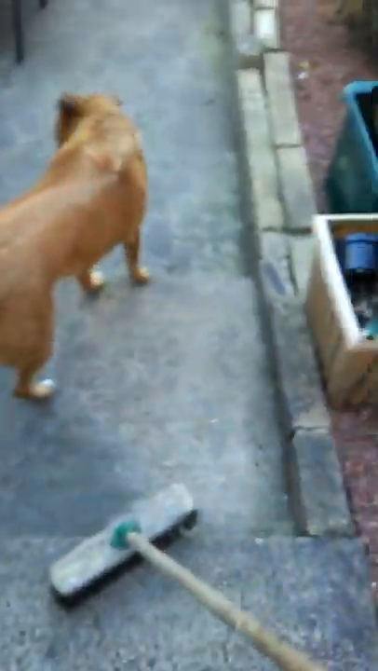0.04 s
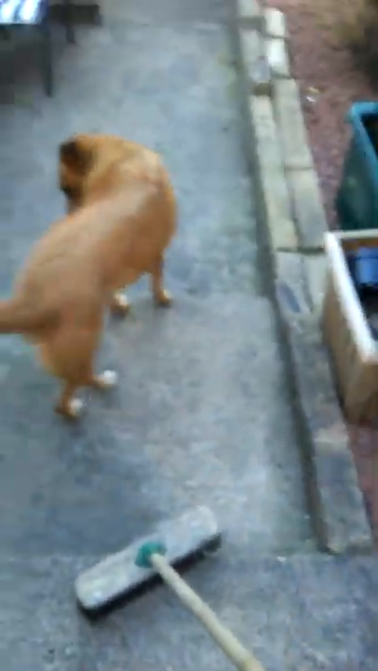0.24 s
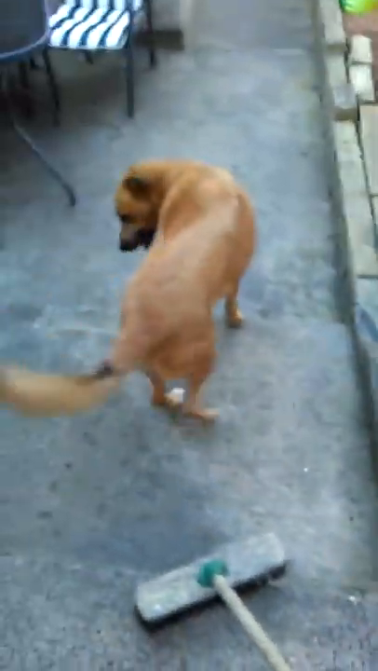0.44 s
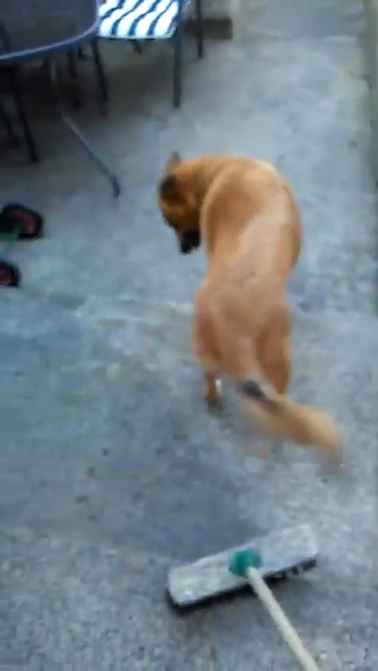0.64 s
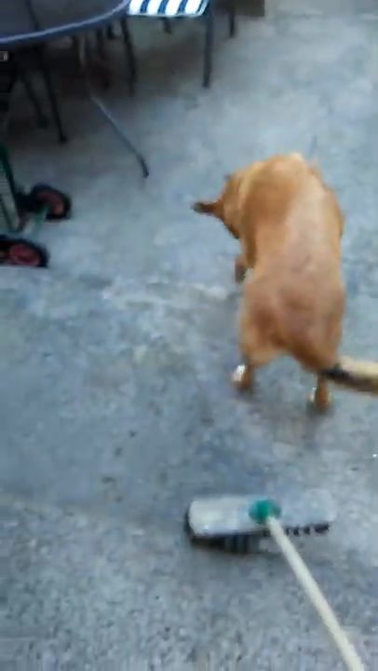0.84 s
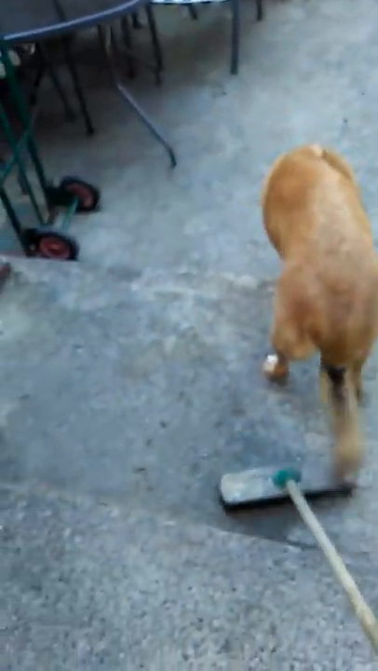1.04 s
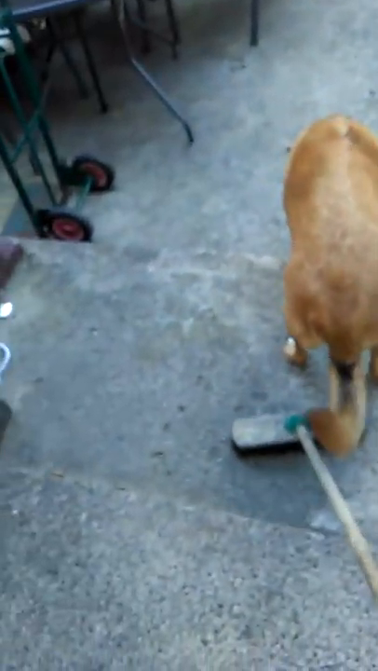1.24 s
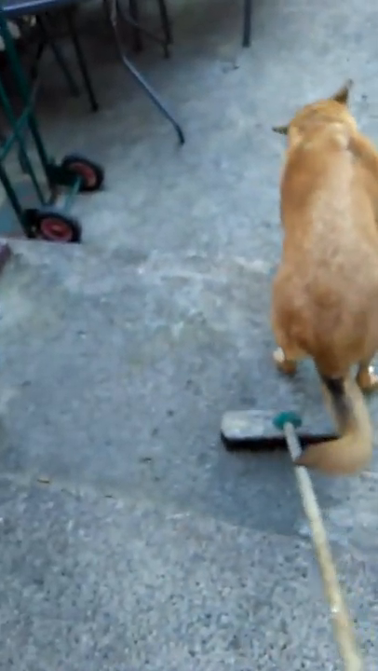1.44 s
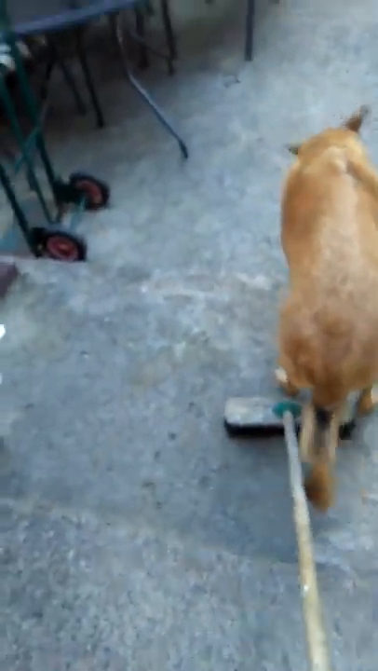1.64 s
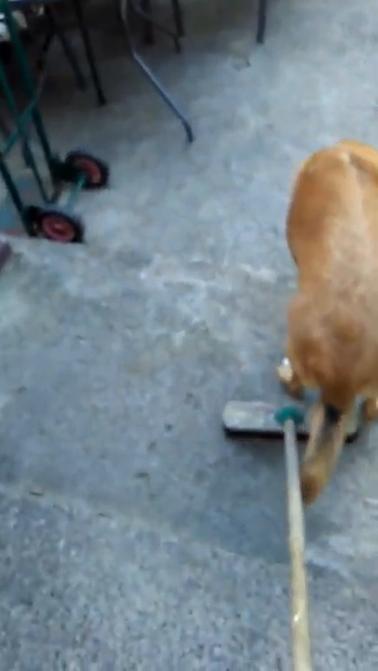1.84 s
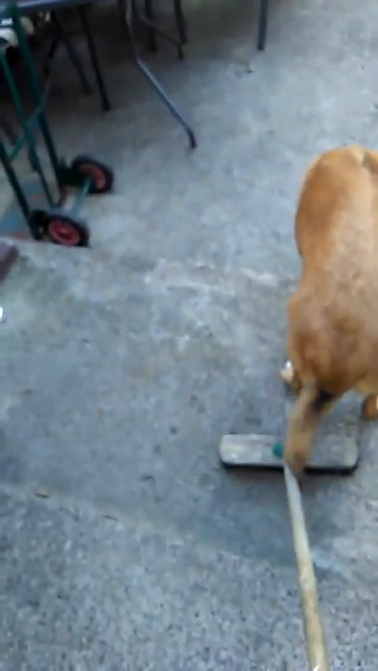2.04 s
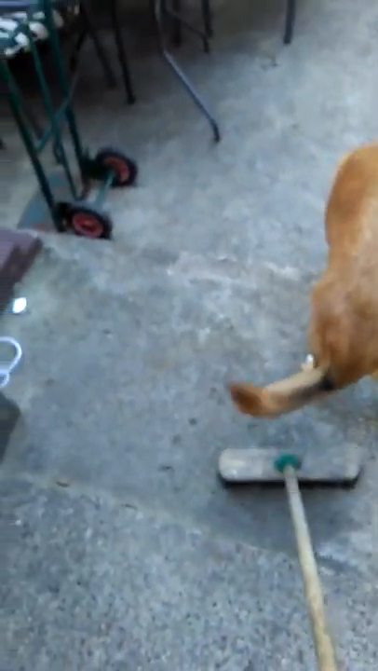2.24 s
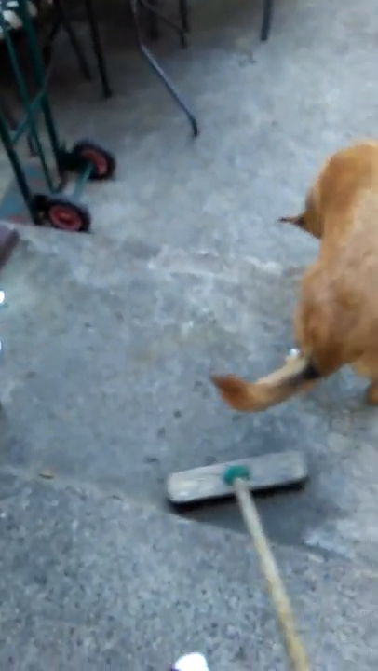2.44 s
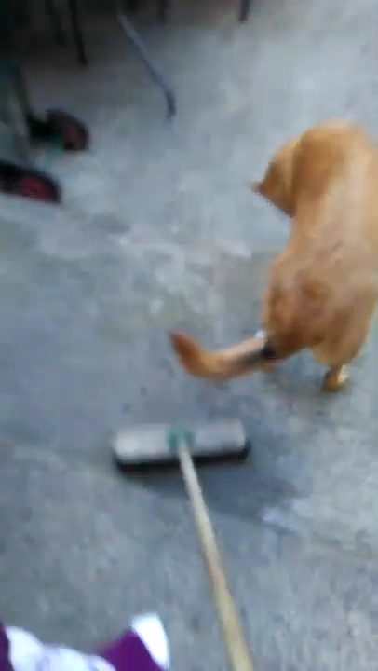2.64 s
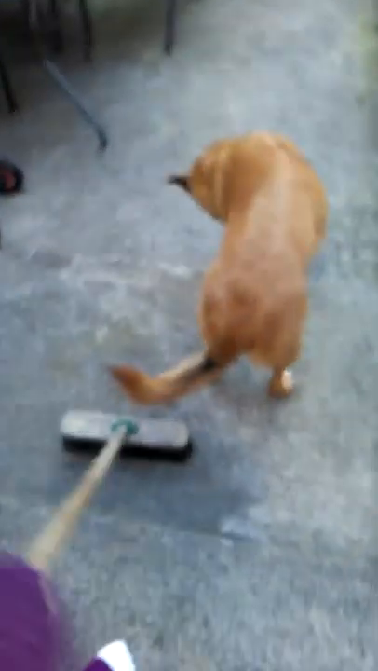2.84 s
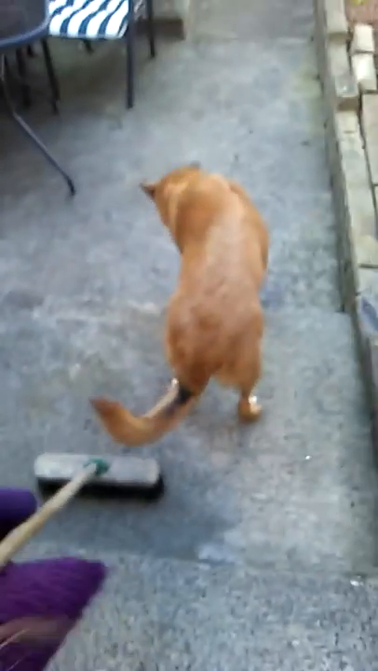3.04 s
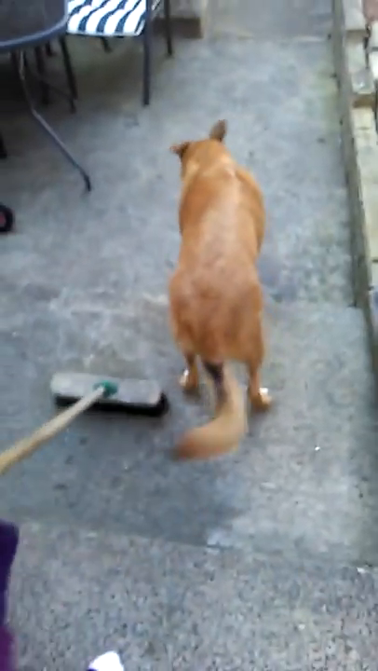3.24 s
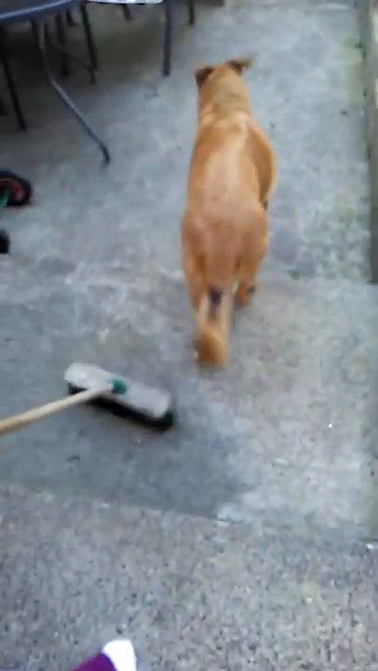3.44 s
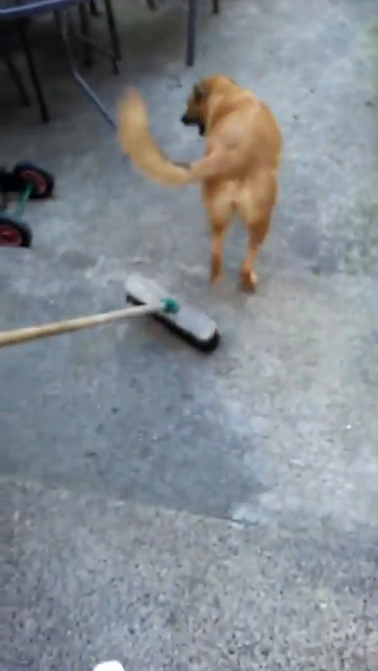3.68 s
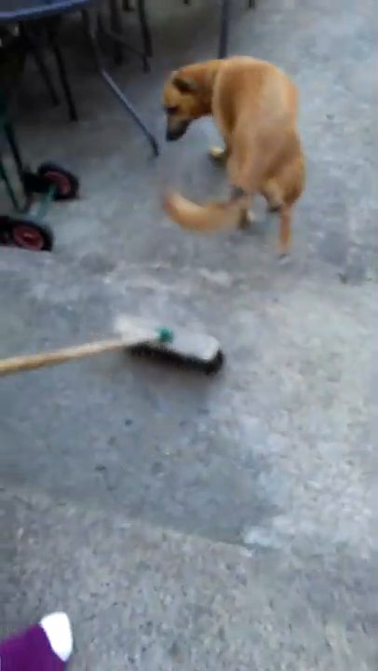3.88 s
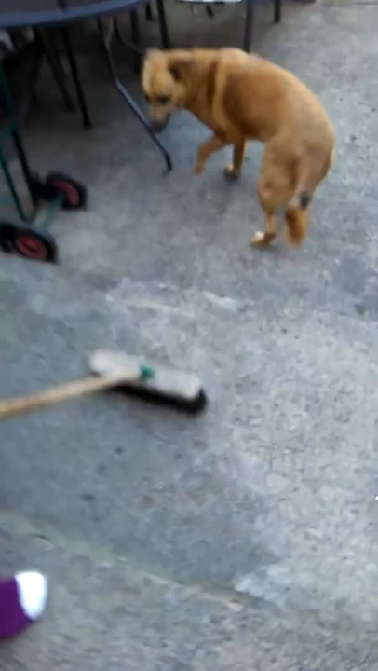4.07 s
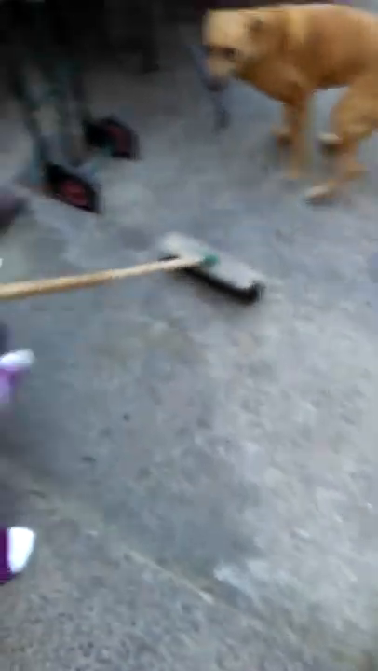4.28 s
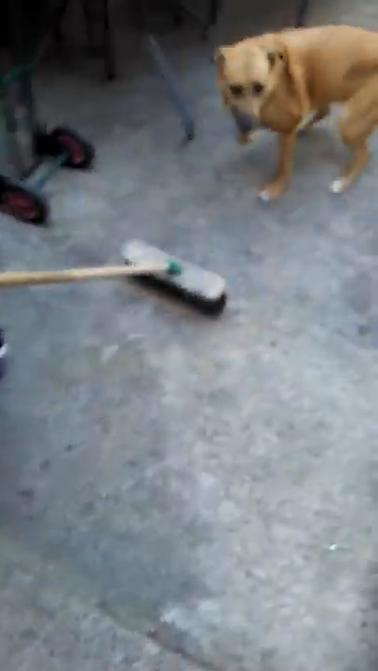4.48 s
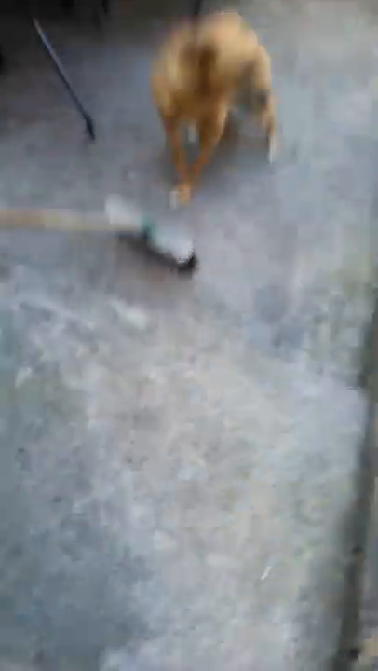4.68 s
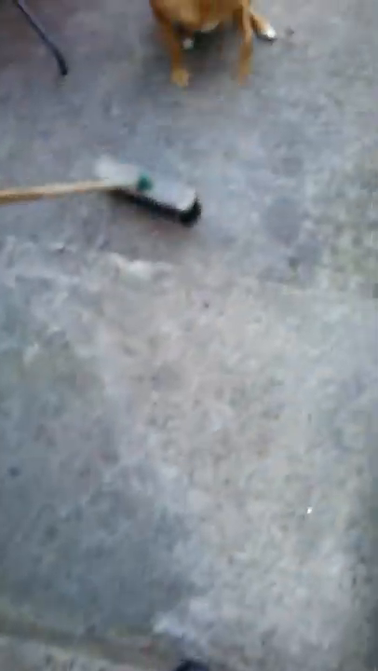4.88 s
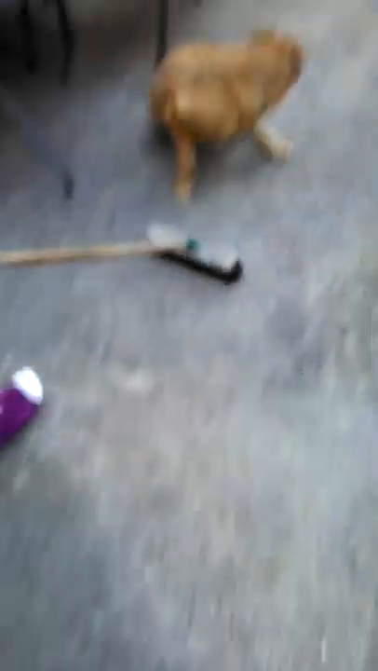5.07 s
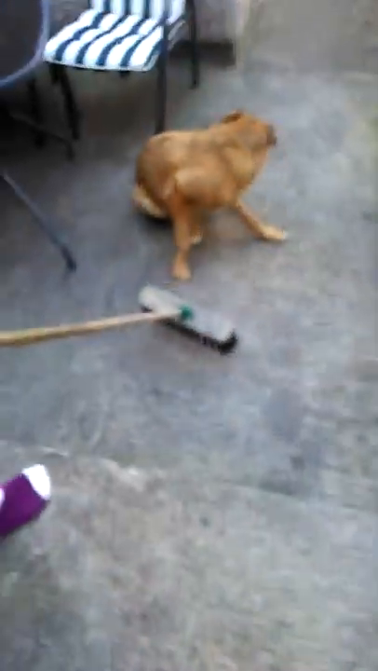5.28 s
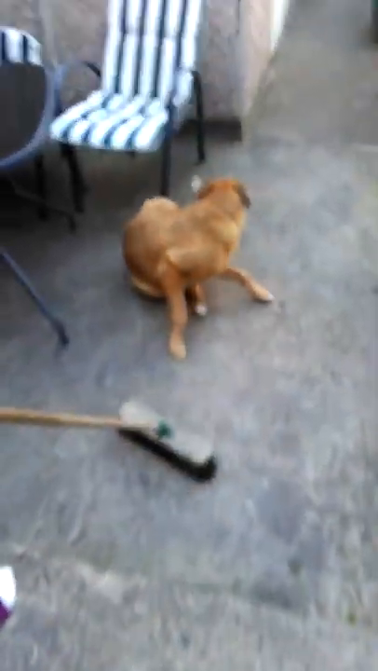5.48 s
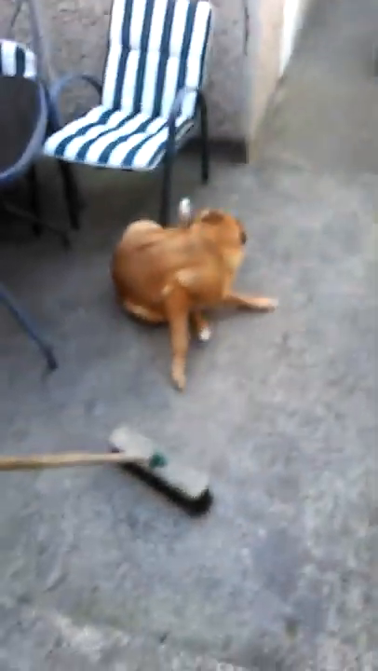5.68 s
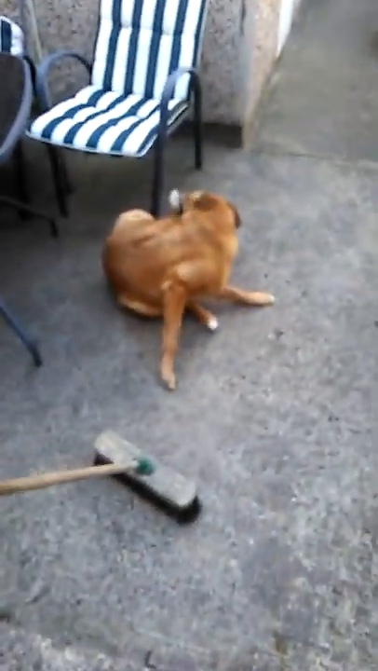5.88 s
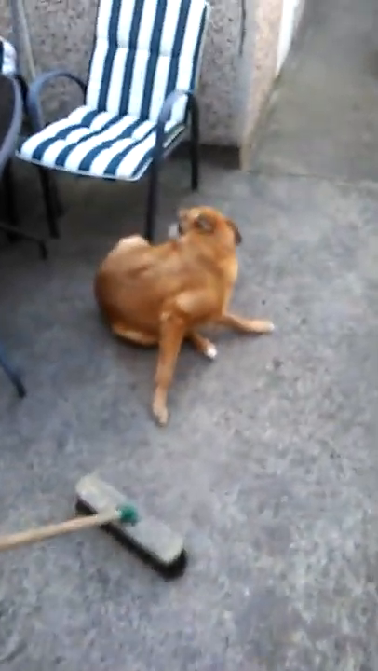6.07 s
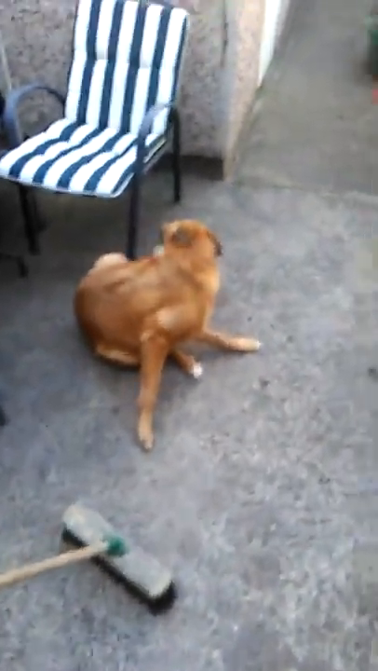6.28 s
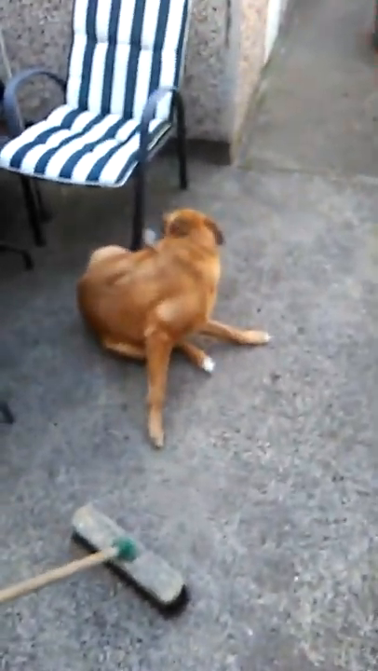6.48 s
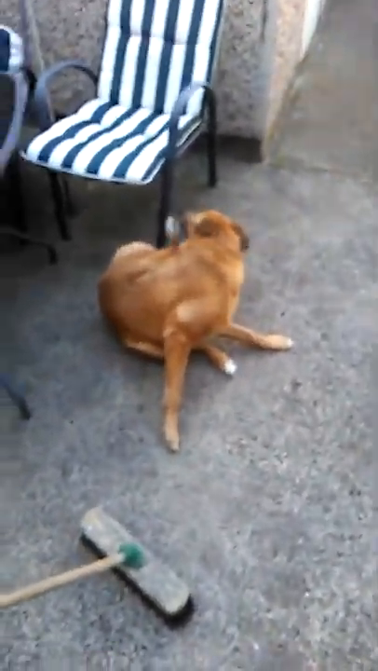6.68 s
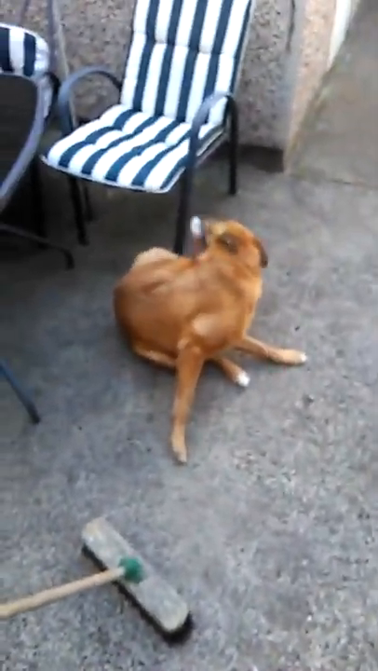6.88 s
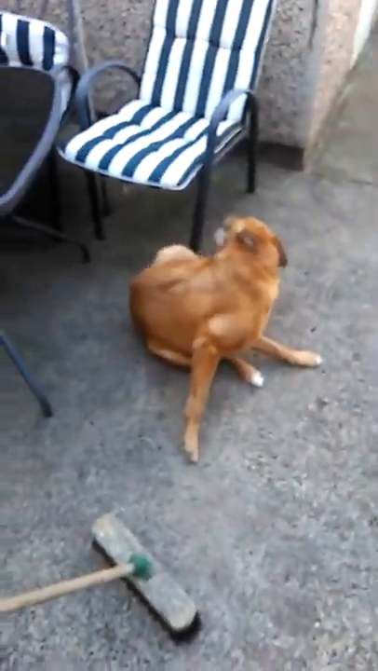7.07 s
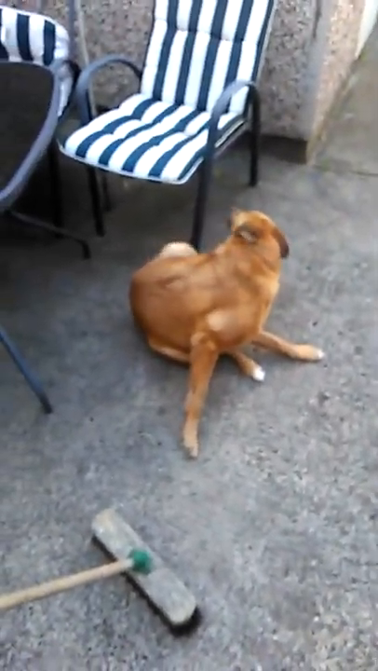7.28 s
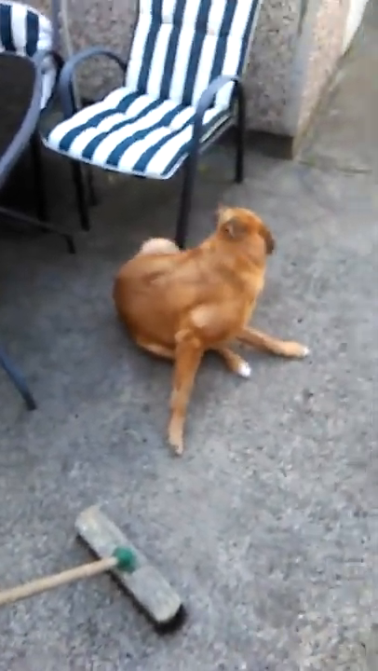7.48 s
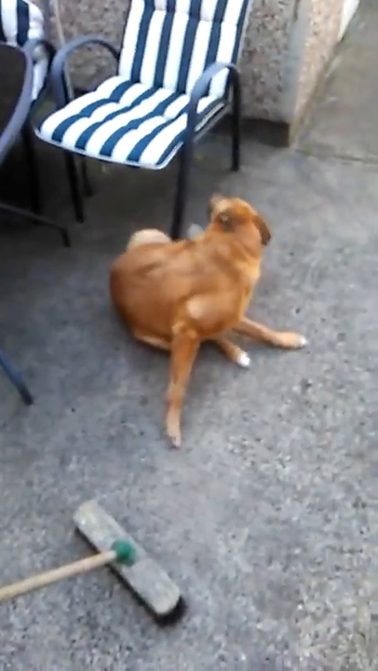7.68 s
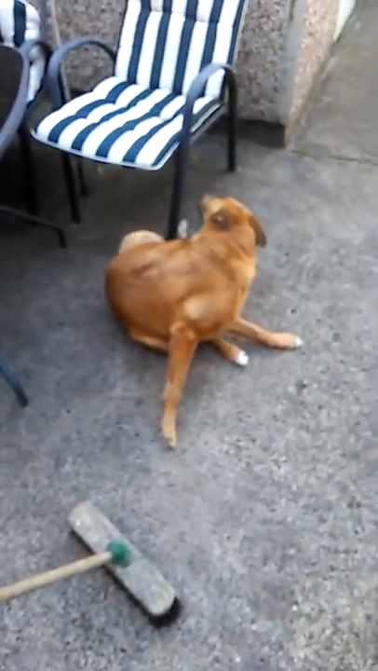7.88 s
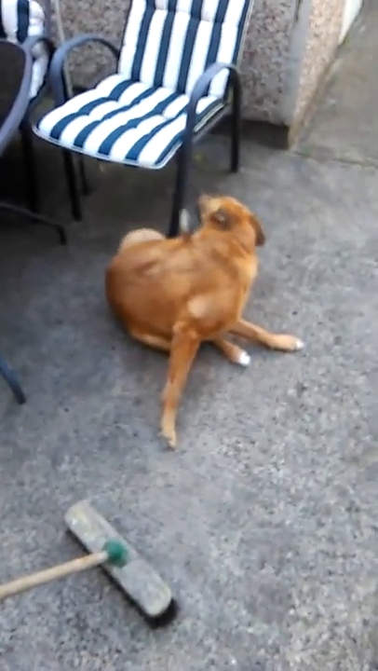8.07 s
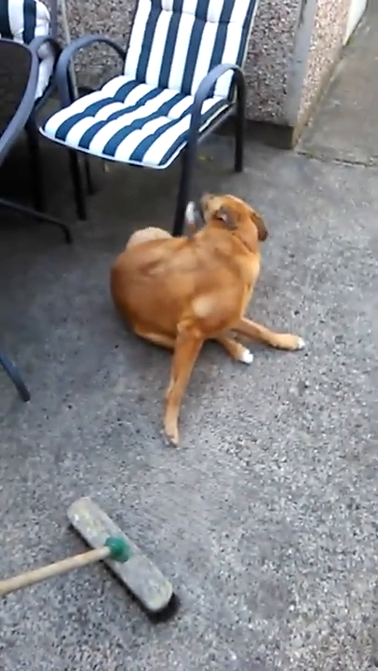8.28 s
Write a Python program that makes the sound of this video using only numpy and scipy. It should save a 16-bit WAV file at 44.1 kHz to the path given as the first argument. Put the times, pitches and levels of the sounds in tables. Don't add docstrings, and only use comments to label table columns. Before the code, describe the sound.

Coarse bristles rasp over a patio, the broom head clacking down harder each time, before quiet, faint dog grunts and dry claw scratching.

```python
import sys
import numpy as np
from scipy import signal
from scipy.fft import rfft, irfft, next_fast_len
from scipy.io import wavfile
from scipy.ndimage import uniform_filter1d, map_coordinates

SR = 44100
rng = np.random.default_rng(int(sys.argv[2]) if len(sys.argv) > 2 else 0)


def digitize_waveform(pressure):
    field = np.atleast_2d(pressure).T
    bounded = np.clip(field, -1, 1)
    quanta = np.round(bounded * 32767).astype(np.int16)
    wavfile.write(sys.argv[1], SR, quanta)


def undo_db(level):
    steps = np.asarray(level, float) / 20
    return 10 ** steps


N = 366912
STEP = 16

# [touch-down t/s, shove already under way/s, whole shove/s, peak level/dB, tip hiss level/dB]
SHOVES = [(0, 0.22, 0.36, -49, -49), (.215, 0.01, 0.13, -46.5, -44), (.44, 0.067, 0.46, -62, 0),
          (0.745, 0.051, 0.33, -35.5, -9), (1.093, 0.12, 0.33, -42.5, -8), (1.27, 0.12, 0.39, -47.5, -12),
          (1.491, 0.046, 0.18, -48.5, -9), (1.554, 0.11, 0.38, -36.5, -13.5), (1.91, 0.057, 0.31, -43, -9),
          (2.03, 0.0089, 0.23, -44.5, -11), (2.13, 0.037, 0.43, -46, -8), (2.412, 0.006, 0.12, -44.5, -12),
          (2.498, 0.041, 0.17, -39.5, -26), (2.63, 0.068, 0.34, -42.5, -5.5),
          (2.8, 0.079, 0.36, -57.5, -20), (3.127, 0.064, .29, -26.5, -11),
          (3.498, 0.018, 0.22, -26.5, -8.5), (4.03, 0.064, 0.21, -53.5, -6), (4.12, 0.015, 0.25, -23.5, -7),
          (4.573, 0.059, 0.16, -31.5, -6.5), (4.621, 0.0092, 0.4, -56.5, -13.5),
          (5.001, 0.078, 0.27, -28, -7.5), (5.464, 0.02, 0.088, -36.5, -12.5),
          (5.54, 0.08, 0.29, -58.5, -3.5)]
# [f/Hz, level/dB per Hz]
BRISTLE_TIPS = [(2800, -31.5), (3500, -19), (3900, -3.5), (4350, 4), (5000, 3), (6000, 3.5), (7200, -10.5),
                (9000, -36.5)]
# [f/Hz, level/dB per Hz]
BENT_BRISTLES = [(2600, -32), (3300, -7), (3800, -1), (4400, -2), (5200, -29.5)]
# [f/Hz, level/dB per Hz]
BRISTLE_SHAFTS = [(1300, -30), (1800, -6), (2150, -5.5), (2500, 0.5), (2900, -3), (3300, -0.5),
                  (3700, -1.5), (4400, -33)]
# [f/Hz, level/dB per Hz]
TIP_HISS = [(5500, -11), (7500, 5.5), (10000, 3.5), (14000, -7.5), (16000, -63)]
# [f/Hz, width/Hz, level/dB]
HEAD_MODES = [(510, 460, -7.5), (670, 160, 2), (932, 78, 1.5), (1470, 170, 0.5), (1848, 267, -6.5),
              (2484, 82, 4.5)]
# [t/s, level/dB]
HEAD_LOAD = [(0, -6), (.5, -11), (.9, -14), (1.3, -15.5), (1.75, -8.5), (2.0, -22), (2.45, -8), (2.75, -8),
             (3.05, -15.5), (3.2, -9.5), (3.5, -7), (5.0, -6.5), (5.9, -12.5)]
# [t/s, level/dB]
BENT_SHARE = [(0, -3), (.5, -8), (1, -14), (1.3, -20), (2.4, -23), (2.55, -1), (2.75, -13.5), (3.2, -4),
              (3.6, -3.5), (4.25, -15), (4.65, -10.5), (5.1, -2), (5.6, -7)]
# [t/s, level/dB]
SHAFT_SHARE = [(0, -4.5), (.28, -2), (.9, -9.5), (1.15, -9.5), (1.65, -9), (2.1, -8.5), (2.4, -11.5),
               (2.55, -3), (2.75, -9), (3.22, -11.5), (3.6, -10.5), (4.25, -9.5), (4.62, -6), (5.1, -7),
               (5.5, -0.5), (5.65, -3)]
# [t/s, left-right level/dB]
BROOM_PLACE = [(0.0, 6), (0.72, 0), (0.82, 3), (2.97, 1), (3.07, -7.5), (3.14, 4), (3.22, -2.5), (3.45, 8),
               (3.5, -0.5), (3.99, 3), (4.01, 0), (5.45, 5.5), (5.49, 1.5), (5.9, 6.5)]
# [t/s, thud level/dB, clack level/dB, splash level/dB, clack f/Hz]
DROPS = [(1.092, -59, -32, -25, 1500), (1.0962, -53, -28.5, -25, 1650), (1.1, -37.5, -40, -28, 1090),
         (1.1045, -50, -27, -24.5, 1610), (1.1076, -50, -25, -38, 1760), (1.554, -50, -51, -33, 1960),
         (1.658, -40.5, -35.5, -44, 910), (2.548, -45, -39, -56, 1470), (3.130, -28.5, -30, -32, 1160),
         (3.1374, -32.5, -21.5, -32.5, 1000), (3.1396, -15.5, -14.5, -20.5, 1080),
         (3.499, -33.5, -32.5, -27.5, 1400), (3.535, -34.5, -19, -17, 1550), (3.956, -91, -49.5, -58, 2100),
         (4.031, -56.5, -40, -34, 670), (4.061, -31, -28.5, -26.5, 980), (4.576, -33.5, -24.5, -41, 1555),
         (4.58, -42, -30.5, -39.5, 1950), (4.583, -37.5, -26.5, -40, 750), (5.004, -44, -30, -26, 1300),
         (5.007, -44.5, -29, -24.5, 2100), (5.02, -16, -23, -59, 740), (5.222, -50, -54, -47, 749),
         (5.397, -38, -52, -62, 1713), (5.475, -28, -29.5, -24, 1830), (5.486, -14, -24, -45, 1610),
         (5.499, -28, -34, -50, 1510), (5.525, -35.5, -61, -40, 748), (6.013, -56, -41, -67, 900)]
# [f/Hz, level/dB, t60/s]
FREE_MODES = [(120, -8, .09), (195, -3, .06), (290, 1, .06), (395, 0, .06), (485, -5, .04), (600, -10, .03)]
# [f/Hz, level/dB, t60/s]
GRIPPED_MODES = [(188, -14, 0.054), (230, -1, 0.035), (350, -1, 0.035), (424, 11, 0.015),
                 (480, -0.5, 0.015), (758, -17, 0.05)]
# [f/Hz, level/dB per Hz]
RATTLE = [(400, -28.5), (750, 3), (1100, -1.5), (1800, -5), (2400, -9), (3200, -29.5)]
# [t/s, length/s, level/dB, f/Hz,
# width/octaves]
DRAGS = [(7.15, 0.067, -68.5, 5700, .2), (7.15, 0.062, -70, 4230, .15), (7.16, .04, -72, 2600, 0.14),
         (4.19, .13, -43, 1600, .08), (5.09, .04, -46.5, 1800, .07), (3.135, 0.044, -38, 210, 0.28),
         (4.058, .05, -49, 180, 0.44), (1.097, .04, -47, 340, .25), (1.652, .03, -50, 530, 0.16),
         (1.74, 0.17, -55, 130, .4), (5.3, 0.13, -57, 150, 0.33), (4.76, .08, -55.5, 130, .2),
         (7.31, 0.058, -60, 202, 0.19), (.06, 0.022, -44, 4700, 0.16), (0.12, 0.074, -58.5, 5100, 0.59),
         (8.121, 0.053, -61, 4000, 0.087), (6.046, .06, -73, 7600, .4), (3.359, 0.14, -59.5, 3860, 0.069),
         (3.831, 0.031, -57, 4570, 0.11), (4.42, 0.056, -52.5, 1480, 0.16),
         (4.414, 0.062, -50.5, 480, 0.36), (4.775, 0.061, -48.5, 3120, 0.69),
         (5.576, 0.2, -63.5, 2900, 0.24), (6.214, 0.082, -64.5, 2040, 0.97),
         (6.512, 0.074, -66, 1400, 0.13), (6.827, 0.025, -52, 660, 0.087), (8.6, 0.044, -67, 910, 0.19),
         (8.04, 0.077, -59, 2450, 0.11), (8.117, 0.051, -53.5, 5600, 0.064), (1.76, 0.054, -49, 261, 0.63),
         (2.255, 0.29, -63, 426, 0.51), (2.549, 0.31, -60, 400, 0.55), (3.524, 0.046, -38, 253, 0.64),
         (4.575, 0.097, -54, 270, 0.73), (5.02, 0.1, -42.5, 121, 0.28), (6.62, 0.12, -55.5, 169.4, 0.18)]
# [t/s, peak level/dB, t60/s,
# brightest f/Hz, left-right level/dB]
CLAW_STROKES = [(0.061, -35.5, 0.12, 4500, -2), (0.14, -48, 0.42, 5800, -11), (3.956, -34, 0.038, 4570, 21),
                (0.2449, -33.5, 0.39, 4700, 11), (5.9234, -58, 0.15, 4060, 3),
                (6.6694, -52, 0.29, 4540, -8), (6.833, -44, 0.1, 4730, -2), (6.84, -38, 0.17, 5900, 2),
                (6.9955, -48, .06, 1890, 3), (7.0025, -39, 0.095, 2820, -3),
                (7.3322, -47, 0.21, 2600, 11.5), (7.3435, -41, 0.094, 2670, -2),
                (7.517, -32, 0.096, 4390, -3), (7.6915, -45, .06, 4490, 7), (7.6985, -39.5, 0.096, 4300, 7),
                (7.887, -37, 0.086, 4550, -3), (8.0609, -35, 0.087, 2470, 19),
                (8.115, -38, 0.066, 3246, 19), (8.1476, -38, 0.054, 3820, 17),
                (8.1757, -35, 0.027, 5570, 5), (8.2379, -42, 0.092, 3995, 14)]
# [t/s, level/dB]
FUR_RUSTLE = [(5.74, -90), (5.77, -58), (5.8, -59.5), (5.9, -99), (5.925, -73), (5.95, -62.5), (6.1, -70.5),
              (6.2, -71.5), (6.29, -75), (6.33, -67), (6.44, -95.5), (6.49, -78), (6.54, -69), (6.6, -76),
              (7.28, -82.5), (8.02, -74), (8.15, -61.5), (8.32, -73)]
# [f/Hz, level/dB per Hz]
COAT_HAIR = [(1200, -19.5), (1900, -6.5), (2300, -8.5), (2750, -5), (3300, -10), (4400, -2.5),
             (5100, -12.5), (5900, -6.5), (7000, -18), (10000, -21), (14000, -44)]
# [t/s, peak level/dB, f/Hz, left-right level/dB]
NAIL_TAPS = [(5.3965, -48, 2400, 0), (3.5005, -36, 6400, 3), (8.128, -48, 5600, 3), (8.136, -51, 5800, 3),
             (8.8, -48, 2470, 4), (1.0945, -30, 4950, 0), (5.0075, -18, 4300, 6), (6.8403, -42, 4100, 1),
             (6.8453, -52, 5940, 0), (7.002, -46.5, 2820, 4), (7.3426, -53, 2690, 4),
             (0.0604, -38.5, 4800, -3), (0.23, -47, 4560, 10), (3.956, -34, 3500, -7),
             (1.5548, -34, 4640, 0), (7.3318, -50, 2610, 4), (7.518, -36.5, 4200, 9),
             (7.7, -55.5, 4340, -7), (7.889, -49, 4100, 0), (7.4, -53, 5630, 4), (8.0618, -44, 2160, 4),
             (8.1175, -32, 3500, 4), (8.1475, -40, 3740, 5), (8.1765, -38.5, 5620, 15),
             (8.2378, -53, 4130, 6)]
# [t/s, third harmonic f/Hz, level/dB]
GROANS = [
    [(5.59, 208.5, -59), (5.668, 204.5, -45.5), (5.74, 170, -62)],
    [(5.82, 170.8, -61), (5.886, 194.6, -51.5), (5.95, 234, -63)],
]
# [multiple, level/dB]
THROAT_OVERTONES = [(1, -25), (2, -2), (3, 2), (4, -9), (5, -17)]
# [t/s, fade to a tenth/s, buffet level/dB, flutter level/dB]
AIR_PUFFS = [(0, 0.13, -28.5, -51), (1.78, 0.16, -41.5, -49.5), (1.85, 0.08, -39, -69),
             (2.658, 0.51, -62.5, -59.5), (3.54, 0.14, -57.5, -60.5), (5.05, 0.0782, -37.5, -43),
             (5.542, 0.11, -36.5, -47), (5.68, 0.2885, -46, -57.5), (6.07, 0.12, -48, -91.5),
             (6.55, 0.14, -44.5, -68.5), (8.18, 0.39, -45.5, -69)]
# [f/Hz, level/dB per Hz]
BUFFET_COLOUR = [(22, -66), (40, 8), (60, 24.5), (110, 12), (160, -37)]
FLUTTER_COLOUR = [(90, -42), (140, 1), (250, 0), (400, -9), (700, -32.5)]
# [t/s, left-right level/dB]
AIR_PLACE = [(0, -5), (.3, -1), (1.8, -2.5), (5.5, -0.5), (6.5, -0.5), (7.9, 2), (8.15, -9), (8.32, -6)]
# [t/s, level/dB, f/Hz, t60/s]
FINGER_BUMP = [
    (8.168, -24, 56, 0.21),
]
# [f/Hz, t60/s]
WALL_DECAY = [(150, 0.028), (600, 0.26), (2000, 0.24), (4000, 0.24), (12000, 0.13)]
# [t/s, firing or buffet f/Hz, tone level/dB, left-right
# level/dB]
ENGINE_IDLE = [(0, 55.3, -58, -5), (.21, 55.73, -48.5, -6), (.7, 56.07, -49, -4), (1.1, 55.8, -44.5, -3),
               (1.41, 56.4, -58, 1), (1.85, 55.5, -41.5, -3), (2, 55.84, -52, -2), (2.6, 54.4, -47, 1),
               (3, 54.74, -52, 2), (3.55, 55, -48, -0.5), (4.66, 55.96, -53.5, 1), (5.86, 55.46, -59, 1),
               (6.25, 55.8, -75, 2), (6.5, 54, -55.5, 8.5), (7.2, 53, -66, 8), (7.7, 55.84, -71, 12),
               (8.05, 56.6, -61, 8), (8.32, 58.2, -59, -18)]
# [multiple of firing, level/dB]
ENGINE_ORDERS = [(1.5, -67), (2, -60.5), (2.5, -61)]
# [f/Hz, level/dB per Hz]
TOWN_RUMBLE = [(22, -23.5), (35, -2), (77, -4.5), (226, -23), (315, -20.5), (570, -20), (970, -22),
               (1320, -34.5), (2400, -39.5), (3900, -40), (6000, -44), (9000, -45), (12000, -52),
               (14300, -62.5)]
# [f/Hz, correlation]
LIKENESS = [(60, 0.93), (150, 0.97), (290, 0.93), (630, 0.48), (1400, 0.18), (3500, 0.13), (7000, 0.25)]
# [f/Hz, left-right level/dB]
PORT_BALANCE = [(60, 0), (110, 0), (200, 1), (370, 1.5), (690, 0.5), (1270, 2.5), (2340, 4), (4310, 6.5),
                (7930, -10), (14600, 6.5)]
# [f/Hz, phase/rad]
PORT_LEAD = [(0, 0), (300, -.2), (700, -1.2), (1050, -1), (1640, .1), (4000, -.4), (5400, -1.6),
             (6550, -5.4), (9000, -13), (12000, -20), (16000, -24)]
# [f/Hz, level/dB]
MIC_BAND = [(20, -14), (36, -4), (48, 0), (13800, 0), (14350, -4), (14500, -32), (16500, -50)]


def sweeping():
    body, tips, bend = shoves()
    head_db = curves(HEAD_LOAD)[0] - 0.26 * (20 * np.log10(body) + 45)
    still_db = -400 * np.maximum(np.arange(N) / SR - BROOM_PLACE[-1][0], 0)
    snaps = patchy(depth_db=1.3, bands_db=2.8) + .7 * slips(per_s=5000, scatter_db=2.2)
    grit = undo_db(.8 * wobble(90) + wobble(260) + .3 * wobble(25))
    stiff, bent, shafts, head, hiss = spread(
        snaps, shape(BRISTLE_TIPS), shape(BENT_BRISTLES), shape(BRISTLE_SHAFTS), head_response, shape(TIP_HISS))
    layers = stiff + undo_db(curves(BENT_SHARE)[0]) * bend ** 1.65 * bent
    layers = layers + undo_db(curves(SHAFT_SHARE)[0]) * shafts
    layers = layers + undo_db(head_db + 1.0) * head
    layers = layers + tips / body * undo_db(-3.5) * hiss
    return body * undo_db(still_db - 4.0) * grit * sides(curves(BROOM_PLACE)[0] - 2.5) * layers


def shoves():
    speed_law, tips_law = 2.25, 0.89
    touch_s = 0.0039
    settle_db, settle_db_per_s = -30, 107
    resting_db = -71
    late_peak, hold = 1.25, 1.08
    t = np.arange(0, N, STEP) / SR
    body, tips, late = undo_db(resting_db), undo_db(resting_db - 9.5), 0
    for s, lead, length, db, hiss_db in SHOVES:
        since_start = t - s + lead
        u = np.clip(since_start / length, 0, 1)
        settle = u ** 4 * undo_db(settle_db - settle_db_per_s * np.maximum(since_start - length, 0))
        speed = np.minimum(hold * np.abs(np.sin(np.pi * u ** late_peak)), 1)
        gain = undo_db(db) * np.clip((t - s) / touch_s, 0, 1) * (speed ** speed_law + settle)
        body = body + gain
        tips = tips + undo_db(hiss_db + db) * (gain / undo_db(db)) ** tips_law
        late = late + gain * u
    return smooth(body), smooth(tips), smooth(late / body)


def head_response(f):
    modes = sum((-1) ** k * undo_db(db) * 1j * f * width / (centre * centre - f * f + 1j * f * width)
                for k, (centre, width, db) in enumerate(HEAD_MODES))
    return modes * (f ** 2 / (f ** 2 + 450 ** 2)) ** 2


def landings():
    let_go_s = 5.2
    out, t = np.zeros((2, N)), np.arange(SR // 8) / SR
    for s, thud_db, clack_db, splash_db, hz in DROPS:
        modes = FREE_MODES if s > let_go_s else GRIPPED_MODES
        thud = undo_db(thud_db - 1.0) * ring(modes, t, scatter_db=2.5) * (1 - np.exp(-t / 0.0036))
        noise = rng.standard_normal((2, 2, len(t)))
        rattle = unit(filtered(.5 * noise[0] + noise[0, 0], shape(RATTLE))) * undo_db(-60 * t / 0.076)
        clack = np.sin(2 * np.pi * hz * t) * undo_db(-60 * t / 0.015) + 0.19 * rattle
        splash = unit(filtered(noise[1], splash_colour)) * undo_db(-60 * t / 0.027)
        contact = undo_db(clack_db + 3) * clack + undo_db(splash_db - 3) * splash
        add(out, s, thud + contact * (1 - np.exp(-t / .0013)))
    return out


def splash_colour(f):
    return shape(BRISTLE_TIPS)(f) + 0.83 * shape(BRISTLE_SHAFTS)(f) + 0.18 * shape(TIP_HISS)(f)


def scuffs():
    out = np.zeros((2, N))
    for s, length, db, hz, width in DRAGS:
        noise = rng.standard_normal((3, SR // 4))[:, :round(length * SR)]
        both = noise[:2] + noise[2] * 500 / hz
        drag = unit(filtered(both, lambda f: peak(f, hz, width)))
        catch = undo_db(1.8 * unit(uniform_filter1d(noise[2], size=120)))
        add(out, s, undo_db(db) * unit(catch * drag) * np.sqrt(np.hanning(drag.shape[1])))
    return out


def scratching():
    out, t = np.zeros((2, N)), np.arange(SR // 6) / SR - .015
    after = np.maximum(t, 0)
    for s, db, t60, hz, pan_db in CLAW_STROKES:
        noise = rng.standard_normal((4, len(t)))
        hairs = undo_db(4 * np.clip(unit(uniform_filter1d(noise[3], size=45)), -2, 1.3))

        def rake_colour(f):
            ripple_db = 3.5 * np.interp(np.log2(f + 1), np.arange(10, 14, .2), noise[3, :20])
            return shape(COAT_HAIR)(f) * (1 + .6 * peak(f, hz, .25)) * undo_db(ripple_db)

        rake = unit(hairs * filtered(noise[:2], rake_colour))
        pad_db = -18 - (1 - 0.28) * (db + 36.5) + 9.0
        pad = unit(filtered(noise[2], lambda f: peak(f, 637, 0.22))) * undo_db(pad_db - 60 * after / 0.13)
        tick = 0.59 * undo_db(-60 * after / 0.016) * (1 - np.exp(-after / 0.0028))
        onset = np.where(t < 0, 0.3 * np.exp(t / 0.005), 1 - .7 * np.exp(-after / .004))
        stroke = 0.61 * undo_db(-60 * after / max(t60, .01)) * onset
        add(out, s + t[0], undo_db(db - 8.0) * (tick + stroke) * sides(0.38 * pan_db) * (rake + pad))
    near = np.clip((np.arange(N) / SR - FUR_RUSTLE[0][0]) * 10, 0, 1)
    rustle = spread(patchy(depth_db=1.5, bands_db=.8), shape(COAT_HAIR))
    return out + near * undo_db(curves(FUR_RUSTLE)[0] + 1 + wobble(14)) * rustle


def taps():
    nail_db, nail_cycles = 3, 8
    out, t = np.zeros((2, N)), np.arange(SR // 100) / SR
    for s, db, hz, pan_db in NAIL_TAPS:
        partials = [(.62, 0.54), (1, 0.8), (1.45, 0.5)]
        tone = sum(share * np.sin(2 * np.pi * hz * k * t) for k, share in partials)
        decay = undo_db(db + nail_db - 60 * t * 4000 / (3 * nail_cycles))
        add(out, s, decay * (1 - np.exp(-t / 0.00084)) * tone * sides(pan_db))
    return out


def grunts():
    out, t = np.zeros(N), np.arange(N) / SR
    for rows in GROANS:
        hz, db = curves(rows)
        gate = np.clip(np.minimum(t - rows[0][0], rows[-1][0] - t) / 0.03, 0, 1)
        phase = 2 * np.pi * np.cumsum(hz * (1 + .012 * wobble(40)) / 3) / SR
        out += gate * undo_db(db + 5.5) * sum(undo_db(level) * np.sin(k * phase) for k, level in THROAT_OVERTONES)
    return out


def air():
    buffet, flutter = gusts()
    puffs = rng.standard_normal((2, N)) + 1.3 * rng.standard_normal(N)
    lumps = undo_db(3.5 * np.array([wobble(5), wobble(5)]))
    out = buffet * undo_db(-4.5) * unit(lumps * filtered(puffs, shape(BUFFET_COLOUR)))
    flutter_noise = spread(rng.standard_normal((2, N)), shape(FLUTTER_COLOUR))
    out += flutter * undo_db(-2.0 + 2.7 * wobble(37)) * flutter_noise
    out = out * sides(curves(AIR_PLACE)[0])
    t = np.arange(SR // 4) / SR
    for s, db, hz, t60 in FINGER_BUMP:
        swing = np.sin(2 * np.pi * hz * (t + 0.0023 * (1 - np.exp(-t / 0.0083))))
        add(out, s, undo_db(db - 60 * t / t60) * (1 - np.exp(-t / 0.0032)) * swing * [[.3], [1]])
    return out


def gusts():
    calm = undo_db([[-63], [-66]])
    t = np.arange(0, N, STEP) / SR
    gains = calm
    for s, fade, buffet_db, flutter_db in AIR_PUFFS:
        rise_or_fall = np.where(t < s, 0.55, 1)
        swell = undo_db(-20 * np.abs(t - s) / fade / rise_or_fall)
        gains = gains + undo_db([[buffet_db], [flutter_db]]) * swell
    return [smooth(gain) for gain in gains]


def walls(x):
    hz, t, z = signal.stft(rng.standard_normal((2, SR // 2)), SR, nperseg=256)
    tail = signal.istft(z * undo_db(-60 * t / along(WALL_DECAY, hz)[:, None]), SR, nperseg=256)[1]
    tail = spread(tail, lambda f: np.ones_like(f))
    late = np.pad(x, ((0, 0), (300, 0)))
    return signal.fftconvolve(late, tail / np.linalg.norm(tail[0]), axes=1)[:, :N]


def engine():
    hz, db, pan_db = curves(ENGINE_IDLE)
    phase = 2 * np.pi * np.cumsum(hz * (1 + 0.012 * wobble(7.4))) / SR
    firing = undo_db(db + 2 + 1.3 * wobble(4.8)) * np.sin(phase)
    orders = sum(undo_db(level - 8 + 2.5 * wobble(26.0)) * np.sin(k * phase) for k, level in ENGINE_ORDERS)
    return firing * sides(0.36 * pan_db) + orders


def town():
    swell = undo_db(.9 * wobble(3))
    far = patchy(depth_db=1.6, bands_db=2)
    return undo_db(-59.5) * swell * spread(far, shape(TOWN_RUMBLE))


def slips(per_s, scatter_db):
    fires = rng.random((2, N)) < per_s / SR
    size = np.minimum(rng.exponential(size=(2, N)), 3)
    return unit(fires * undo_db(scatter_db * size) * rng.standard_normal((2, N)))


def patchy(depth_db, bands_db):
    z = signal.stft(rng.standard_normal((2, N)), nperseg=256)[2]

    def blur(high, long):
        field = uniform_filter1d(rng.standard_normal(z.shape[1:]), size=high, axis=0)
        return unit(uniform_filter1d(field, size=long, axis=1))

    field_db = depth_db * blur(4, 10) + bands_db * blur(2, 70)
    return signal.istft(z * undo_db(field_db), nperseg=256)[1][:, :N]


def spread(pair, *gains):
    def response(hz):
        turn = np.arccos(np.clip(along(LIKENESS, hz), -1, 1)) / 2
        return np.array([gain(hz) for gain in gains])[:, None] * [np.cos(turn), np.sin(turn)]
    layers = [unit(np.array([mid + side, mid - side])) for mid, side in filtered(pair, response)]
    return layers if len(gains) > 1 else layers[0]


def ring(modes, t, scatter_db):
    draw = rng.standard_normal((len(modes), 2))
    return sum(undo_db(db + scatter_db * a - 60 * t / t60) * np.sin(2 * np.pi * hz * (1 + .025 * b) * t)
               for (hz, db, t60), (a, b) in zip(modes, draw))


def peak(hz, centre_hz, width):
    return np.exp(-.5 * (np.log2((hz + 1) / centre_hz) / width) ** 2)


def shape(spectrum):
    return lambda hz: undo_db(along(spectrum, hz))


def filtered(x, response):
    m = next_fast_len(x.shape[-1] + 8192)
    return irfft(rfft(x, m) * response(np.fft.rfftfreq(m, 1 / SR)), m)[..., :x.shape[-1]]


def along(points, hz):
    f, v = np.transpose(points)
    return np.interp(np.log(hz + 1), np.log(f + 1), v, left=v[0], right=v[-1])


def sides(pan_db):
    return np.array([undo_db(pan_db / 2), undo_db(-pan_db / 2)]).reshape(2, -1)


def curves(rows):
    s, *cols = np.transpose(rows)
    return [np.interp(np.arange(N) / SR, s, c) for c in cols]


def wobble(rate):
    knots = rng.standard_normal(int(N * rate / SR) + 4)
    return smooth(map_coordinates(knots, [np.arange(0, N, STEP) * rate / SR]))


def smooth(slow):
    return np.interp(np.arange(N), np.arange(0, N, STEP), slow)


def unit(x):
    return x / np.sqrt(np.mean(x ** 2) + 1e-20)


def add(track, s, sound):
    at = round(s * SR)
    track[:, at:at + sound.shape[1]] += sound[:, :N - at]


def scene():
    sweep = sweeping()
    hits = landings() + scuffs() + scratching() + taps()
    echoes = walls(undo_db(-9.5) * hits + undo_db(-12.0) * sweep)
    return sweep + hits + grunts() + air() + echoes + engine() + town()


def low_pass(x):
    return signal.sosfilt(signal.butter(12, 15200, fs=SR, output="sos"), x)


def record(dry):
    def ports(hz):
        lead = np.interp(hz, *np.transpose(PORT_LEAD))
        return sides(along(PORT_BALANCE, hz)) * shape(MIC_BAND)(hz) * np.exp(.5j * lead * [[1], [-1]])
    mix = filtered(dry, ports)
    return low_pass(mix)


dry = scene()
out = record(dry)
digitize_waveform(out)
```